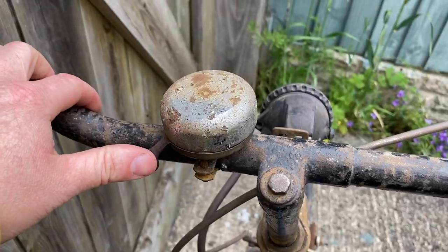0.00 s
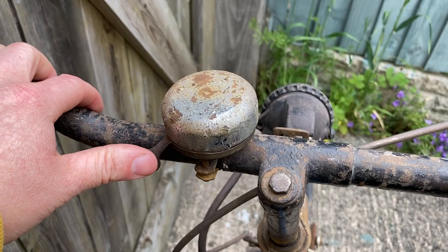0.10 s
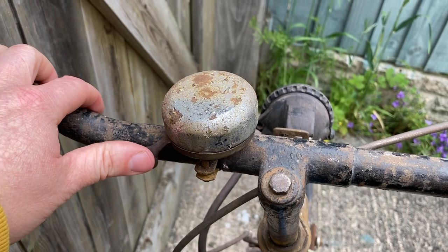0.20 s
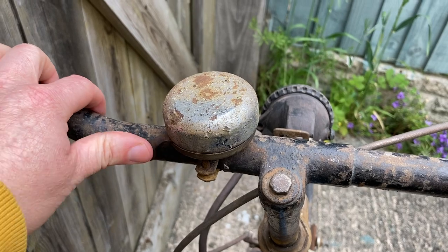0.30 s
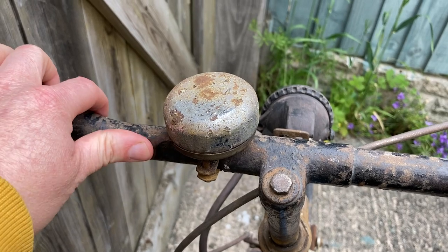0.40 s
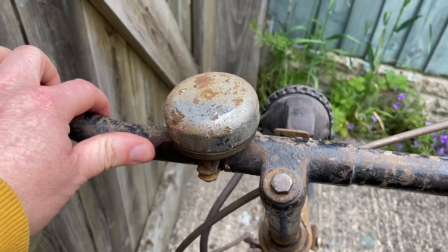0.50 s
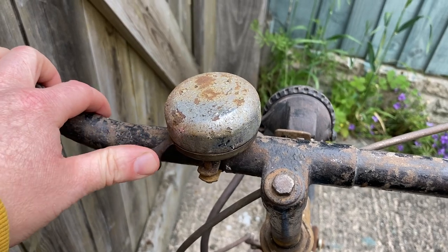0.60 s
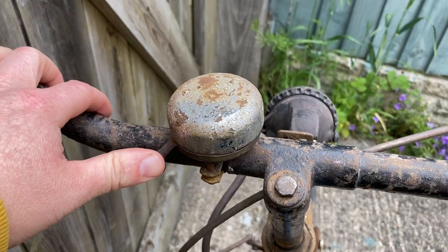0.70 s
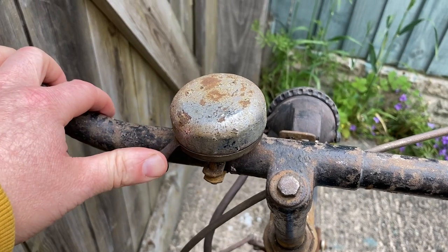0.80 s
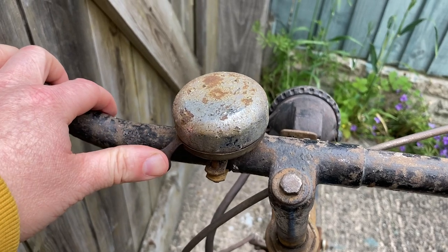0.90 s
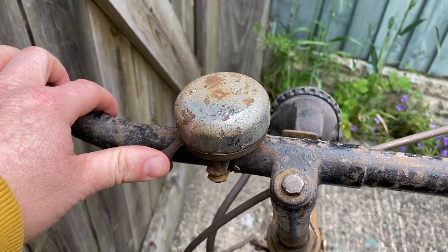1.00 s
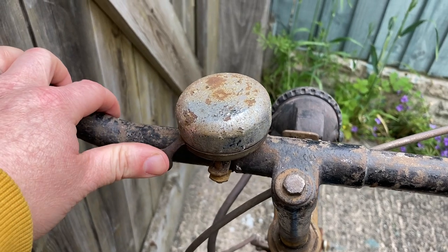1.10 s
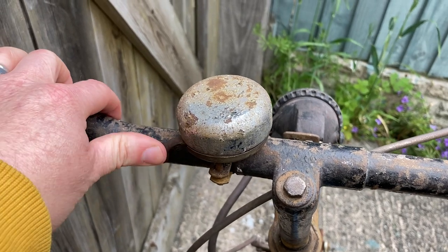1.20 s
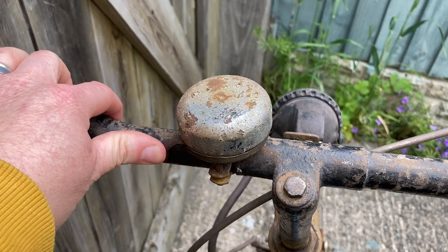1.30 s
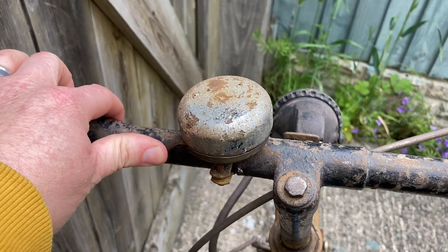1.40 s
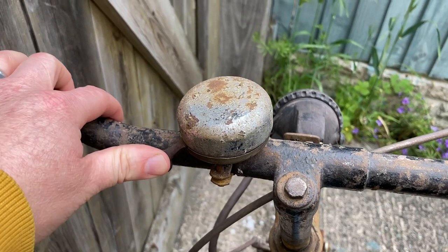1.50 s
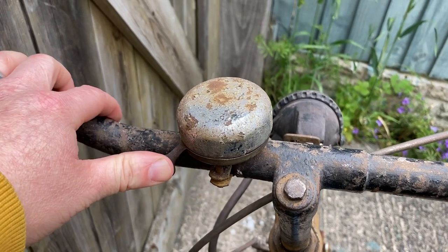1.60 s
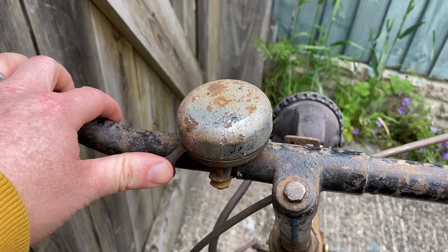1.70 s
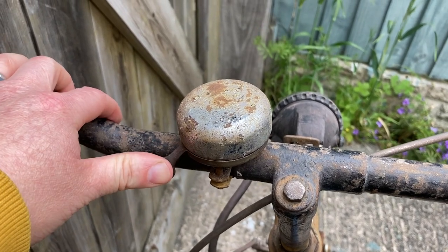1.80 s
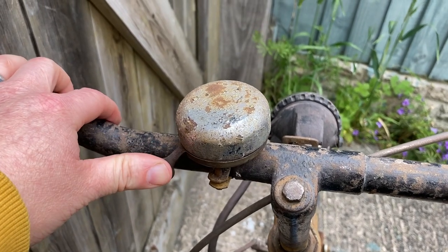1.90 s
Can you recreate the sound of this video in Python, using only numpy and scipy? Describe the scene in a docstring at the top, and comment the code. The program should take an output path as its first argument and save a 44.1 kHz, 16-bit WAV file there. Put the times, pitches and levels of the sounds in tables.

```python
"""An old rusty bicycle bell close to a stereo microphone in a yard, its lever thumbed and let back twice.
Each stroke of the lever spins a small gear that ticks, scrapes and flings strikers at the dome;
the dome rings in five split pairs of damped modes, while shaped noise cracks, clanks and thumps with it.
Lever and handlebar add damped tones. The yard answers with a decaying noise tail,
and behind lie far twittering, made of short sliding whistles, and a filtered-noise town rumble."""
import sys
import numpy as np
from scipy import signal
from scipy.fft import rfft, irfft, next_fast_len
from scipy.io import wavfile
from scipy.ndimage import uniform_filter1d

SR = 44100
rng = np.random.default_rng(int(sys.argv[2]) if len(sys.argv) > 2 else 0)


def elevation(decibels):
    """Turn decibel levels (scalar or array-like) into linear amplitude ratios."""
    levels = np.asarray(decibels, float)
    return 10 ** (levels / 20)


def put_to_file(sound):
    """Save the sound as 16-bit audio at rate SR, in the file named by the first command-line argument."""
    columns = np.atleast_2d(sound).T  # one column per channel
    safe = np.clip(columns, -1, 1)
    whole_steps = np.round(safe * 32767)
    wavfile.write(sys.argv[1], SR, whole_steps.astype(np.int16))


N = 88200
T = np.arange(N) / SR

# contacts with the dome, striker blows and lastly the lever's stop damping it: t/s,
# level/dB of the five mode pairs from low to high (5 columns), lean (tilt of level between paired modes)
BLOWS = [(0.2434, -47, -38.5, -36.5, -15, -12, 0), (0.3132, -50, -35, -39, -15, -12, -3),
         (0.3512, -50, -39, -50, -28, -24, -6), (0.5476, -49.5, -42.5, -41.5, -11, -10, 1),
         (0.581, -51, -38.5, -45, -13, -11.5, -5.5), (0.6084, -44.5, -40.5, -36, -22.5, -16.5, 10),
         (.6360, -48.5, -46, -41.5, -22, -10, 9.5), (1.1143, -53.5, -51.5, -59, -36.5, -39.5, -1.5),
         (1.1791, -42.5, -32.5, -32, -15.5, -14, -1), (1.2072, -42.5, -33.5, -39.5, -18, -9, 6.5),
         (1.241, -46.5, -34.5, -42, -22.5, -19.5, 2), (1.4691, -46, -36.5, -36, -15.5, -22.5, -3),
         (1.5318, -42.5, -28.5, -30, -11.5, -23, -6.5), (1.5574, -38.5, -29, -37.5, -19.5, -15.5, 3.5),
         (1.573, -47.5, -40.5, -44, -30.5, -35.5, 7.5)]


def unit(x):
    """Scales a signal to rms 1."""
    return x / np.sqrt(np.mean(x ** 2) + 1e-20)


def along(points, hz):
    """Reads (f/Hz, value) points on a log frequency axis."""
    f, v = np.transpose(points)
    return np.interp(np.log(hz + 1), np.log(f + 1), v)


def filtered(x, response):
    """Multiplies the spectrum of x by a complex response of frequency."""
    m = next_fast_len(N + 8192)
    spectrum = rfft(x, m) * response(np.fft.rfftfreq(m, 1 / SR))
    return irfft(spectrum, m)[..., :N]


def noise(spectrum, envelope=1):
    """Noise under an envelope, then coloured (rms 1 where a steady envelope is 1)."""
    def gain(hz):
        return elevation(along(spectrum, hz))

    size = np.sqrt(np.mean(gain(np.linspace(0, SR / 2, 4096)) ** 2))
    return filtered(envelope * rng.standard_normal(N), gain) / size


def bursts(times, dbs, t60):
    """Envelope that jumps at each time and dies away by 60 dB in t60 seconds."""
    kicks = np.bincount((np.asarray(times) * SR).astype(int), elevation(dbs), N)[:N]
    return signal.lfilter([1], [1, -elevation(-60 / (max(t60, 1e-3) * SR))], kicks)


def level(strokes):
    """Gain from one (t/s, level/dB) table per stroke, at -120 dB outside each."""
    return sum(elevation(np.interp(T, *np.transpose(p), -120, -120)) for p in strokes)


def knocks(rows, rise_s):
    """Damped sines with a soft start, from rows of t/s, level/dB, f/Hz, t60/s."""
    t = np.maximum(T - np.array(rows)[:, :1], 0)
    _, db, hz, t60 = np.array(rows).T[..., None]
    fade = elevation(db - 60 * t / t60) * (1 - np.exp(-t / rise_s))
    return (fade * np.sin(2 * np.pi * hz * t)).sum(0)


def dome():
    """Each contact chokes the old ring and sets a new level; the two close modes of each pair beat."""
    # the ten modes, lower then upper of each pair: level/dB, t60/s of the first ring, dB per unit of lean
    modes = [(0.5, 0.98, 0), (0.5, 0.94, 0.14), (-0.5, 0.3, 0), (-1.5, 0.3, 1), (-1, 0.13, 0.5),
             (2, 0.14, 0.3549), (0.5, 0.085, 0.5), (-2.5, .095, -0.26), (-3, 0.063, 0), (-7.5, 0.041, 0.12)]
    # pitch of the ten modes: f/Hz
    mode_hz = [1608.7, 1653.6, 3899, 3966, 6684, 6782, 9963, 10099, 13781, 13895]
    # how each mode reaches the two ports of the microphone: left over right/dB, left leads/rad
    ports = [(-0.5, 1.5), (3, -2.5), (1, 0.08), (14, 0.74), (-1.5, 0.43), (2.5, 0), (-0.5, 2.33),
             (1.5, 1.93), (2, 3), (-1, 3.5)]
    # upper mode of each pair: lead over the lower/rad, gain on the return/dB
    upper = [(2.5, 2.5), (-0.6, 1), (-1.47, 4.5), (0.32, -4), (3, 5.5)]
    # lever coming back, strikers circling the other way: from/s, to/s
    returns = [(.45, .8), (1.35, 1.7)]
    # rows, counted from 0, where the lower modes swing on: a light blow, and the lever's stop damping the dome
    swing_on = (2, 14)
    rise_s, mute_s = .0004, 0.00049  # time constants of start and choke
    after_db, after_longer = -14.5, 1.84  # a weaker late ring that outlasts the first

    out = np.zeros((2, N))
    ends = [b[0] for b in BLOWS[1:]] + [np.inf]
    for n, ((s, *pair_db, lean), end) in enumerate(zip(BLOWS, ends)):
        # the choked ring runs a little past the next contact
        a, b = int(s * SR) + 1, int(min(end * SR + 400, N))
        t = T[a:b] - s
        gate = (1 - np.exp(-t / rise_s)) * np.exp(-np.maximum(T[a:b] - end, 0) / mute_s)
        back = any(t0 < s < t1 for t0, t1 in returns)
        for k, (db, t60, tip) in enumerate(modes):
            pair, is_upper = k // 2, k % 2
            hz, (pan_db, lead) = mode_hz[k], ports[k]
            upper_lead, return_db = upper[pair]
            # the lower four pairs may swing on from the contact before
            since = s - BLOWS[n - 1][0] if n in swing_on and k < 8 else 0
            # the upper mode flips its sign between push and return
            swing = 2 * np.pi * hz * (t + since) + is_upper * (upper_lead + np.pi * (not back))
            fade = elevation(-60 * t / t60) + elevation(after_db - 60 * t / (t60 * after_longer))
            strength_db = pair_db[pair] + db + tip * lean + is_upper * back * return_db
            ring = gate * fade * elevation(strength_db)
            out[0, a:b] += ring * np.sin(swing + lead / 2)
            out[1, a:b] += ring * np.sin(swing - lead / 2) * elevation(-pan_db)
    return out


def contact():
    """A bright crack, a rough clank of the rim and a dull thump through the bar at each contact."""
    # colour of the crack: f/Hz, level/dB
    crack = [(1200, -54.5), (2000, -31.5), (2900, -27.5), (3900, -17.5), (5300, -23.5), (7500, -2),
             (9500, -8), (12000, 14.5), (15500, -1), (16500, -20), (17000, -89)]
    # colour of the clank: f/Hz, level/dB
    clank = [(2800, -45.5), (3400, -9), (3930, 2), (4500, -5.5), (5500, -54)]
    # colour of the thump: f/Hz, level/dB
    thump = [(40, -23), (100, 7), (200, 3), (450, -13.5), (800, -3), (1200, -7), (2000, -6), (3000, -120)]
    # each contact in turn, over the usual share: crack/dB, thump/dB
    shares = [(-0.5, -9.5), (-3, -10.5), (-7, -2), (-3.5, -16), (2.5, -15), (3, -4), (2.5, -4.5), (4, 0.5),
              (8.5, -5), (3.5, -7.5), (8, 1.5), (4.5, -8.5), (5.5, -3), (5.5, -7), (-7, 3)]
    rows = np.array(BLOWS)
    times = rows[:, 0]
    crack_db, thump_db = np.transpose(shares)
    force_db = rows[:, 4:6].mean(1)  # from the fourth and fifth pairs
    rim_db = rows[:, 2]  # from the second pair
    cracks = noise(crack, bursts(times, force_db + crack_db + 5, t60=.005))
    clanks = noise(clank) * bursts(times, rim_db - 12.5, t60=0.054)
    thumps = noise(thump) * bursts(times, force_db + thump_db - 24.5, t60=0.056)
    return cracks + clanks + thumps


def gear():
    """Single teeth while slow, an uneven scrape and a low grind while fast."""
    # single teeth: t/s, level/dB
    tooth_rows = [(0.1805, -49.5), (0.1955, -45), (0.207, -45), (0.2187, -50.5), (0.2268, -41),
                  (0.2347, -40), (0.2397, -48.5), (0.2955, -38.5), (0.3035, -33.5), (.3400, -41.5),
                  (.358, -40.5), (0.5085, -48.5), (0.5222, -45.5), (0.5325, -44.5), (0.5385, -39.5),
                  (1.0725, -54), (1.0983, -41), (1.1092, -46.5), (1.128, -38.5), (1.1355, -32),
                  (1.1425, -48.5), (1.149, -42), (1.155, -40), (1.1605, -36.5), (1.1675, -39.5),
                  (1.1735, -37.5), (1.421, -57), (1.4365, -53.5), (1.448, -48), (1.4572, -46), (1.515, -32)]
    # colour of a tooth: f/Hz, level/dB
    tooth = [(1100, -45.5), (1550, -10.5), (2000, -25.5), (3500, -20), (5300, -30), (6900, -13.5),
             (9000, -13.5), (11000, 4), (12600, -10), (15300, -14.5), (16200, -24), (16800, -78.5)]
    # whirr of the spinning gear, one table per stroke: t/s, level/dB
    whirr = [
        [(.2, -62), (.25, -50.5), (.29, -51.5), (.32, -43), (.36, -44.5), (.385, -67), (.42, -81)],
        [(.52, -64), (.55, -53.5), (.63, -53), (.665, -45.5), (.68, -55.5), (.72, -97)],
        [(1.09, -65.5), (1.12, -52), (1.175, -46), (1.25, -32), (1.27, -78), (1.3, -104)],
        [(1.44, -77), (1.48, -39), (1.52, -49.5), (1.58, -35), (1.61, -57), (1.66, -80.5)],
    ]
    # colour of the whirr: f/Hz, level/dB
    scrape = [(1800, -45), (2800, -18.5), (5500, -30), (7800, -10), (9200, -22.5), (11000, 6),
              (13000, -10.5), (15300, -11), (16500, -61.5)]
    # low grind of the gear, one table per stroke: t/s, level/dB before a common 1 dB cut
    grinding = [
        [(0.17, -72), (0.256, -57.5), (0.292, -67.5), (0.32, -52), (0.408, -78.5), (0.42, -93)],
        [(0.5, -84.5), (0.548, -60.5), (0.628, -56), (0.66, -58), (0.678, -92), (0.72, -103)],
        [(1.06, -73), (1.174, -60), (1.182, -47.5), (1.236, -55.5), (1.242, -51), (1.31, -72.5)],
        [(1.41, -80.5), (1.466, -61.5), (1.57, -53), (1.58, -49), (1.612, -70), (1.64, -74.5)],
    ]
    # colour of the grind: f/Hz, level/dB
    grind = [(120, -39), (200, -8), (334, -11.5), (440, -1.5), (729, -16), (1100, -2.5), (1320, -6.5),
             (1450, -1.5), (1880, -34), (3190, -120)]
    steady = 0.11  # share of the whirr that is not grainy

    teeth = bursts(*np.transpose(tooth_rows), t60=.01)
    draw = rng.standard_normal((2000, 2))
    at = np.cumsum(abs(draw[:, 0])) / 290  # irregular gaps, 1/290 s rms
    size_db = 1.5 * draw[:, 1]
    heard = at < N / SR
    grain = unit(bursts(at[heard], size_db[heard], t60=.011))
    scraping = noise(scrape, level(whirr) * (steady + (1 - steady) * grain))
    return noise(tooth, teeth) + scraping + elevation(-1) * level(grinding) * noise(grind)


def lever():
    """The lever clunks against its stop in a few damped modes."""
    # meetings with the stop: t/s, level/dB, pitch over usual (ratio)
    stops = [(.649, -39, 1.04), (1.573, -32.5, .97)]
    # modes of the lever at usual pitch: f/Hz, level/dB, t60/s
    modes = [(1150, -0.5, .045), (2510, -25, 0.11), (3500, -28.5, .06), (5300, -30, .06)]
    rows = [(s, db + mode_db, hz * pitch, t60)
            for s, db, pitch in stops for hz, mode_db, t60 in modes]
    return knocks(rows, rise_s=0.004)


def handlebar():
    """The handlebar hums in low damped tones after a hard stroke."""
    # hums: t/s, level/dB, f/Hz, t60/s
    hums = [(.64, -45.5, 149.4, 0.29), (1.24, -60.5, 151.4, 0.71), (1.58, -41.5, 155, 0.24)]
    return knocks(hums, rise_s=0.031)


def spread(x):
    """Broad sounds of the bell lead in phase at the left port and, in the low middle, are louder there."""
    # lead of the left port: f/Hz, phase/rad
    lead = [(150, 0), (300, 1.1), (1200, 1.3), (3000, .3), (7000, 0), (10000, 1.9), (12300, 2.3),
            (14000, 2.9), (16000, 5.6)]
    # left over right: f/Hz, level/dB
    left = [(150, 1), (300, 5), (800, 6), (1500, 2), (6000, 0)]

    def ports(hz):
        turn = np.exp(np.outer([.5j, -.5j], along(lead, hz)))
        return turn * elevation(np.outer([.5, -.5], along(left, hz)))

    return filtered(x, ports)


def yard(x):
    """Fence and wall answer with a stereo noise tail; each frequency dies at its own speed."""
    # decay of the yard: f/Hz, t60/s
    decay = [(500, 0.083), (4000, 0.17), (12000, 0.056)]
    hz, t, z = signal.stft(rng.standard_normal((2, SR // 2)), SR, nperseg=256)
    fade = elevation(-60 * t / along(decay, hz)[:, None])
    tail = signal.istft(z * fade, SR, nperseg=256)[1]
    return signal.fftconvolve(x[None], tail / np.linalg.norm(tail[0]), axes=1)[:, :N]


def birds():
    """Many short sliding whistles, too far to tell apart."""
    # far twittering ahead of the yard's answer: t/s, level/dB
    twitter = [(0, -82), (.12, -95), (1.6, -105), (1.68, -77), (1.8, -79), (1.86, -98.5), (2, -100)]
    # lowest and highest starting pitch: f/Hz
    low_hz, high_hz = (3130, 5260)
    per_s, note_s = 550, 0.057
    draw = rng.random((900, 3))
    at = np.cumsum(2 * draw[:, 0]) / per_s
    u = np.linspace(0, 1, int(note_s * SR))
    start_hz = low_hz + (high_hz - low_hz) * draw[:, 1:2]
    hz = start_hz * (1 + .15 * (draw[:, 2:] - .6) * u)  # slides by -9 to +6 percent
    notes = np.sin(np.pi * u) ** 2 * np.sin(2 * np.pi * np.cumsum(hz, 1) / SR)
    where = (at * SR).astype(int)[:, None] + np.arange(len(u))
    flock = np.bincount(where.ravel(), notes.ravel(), N)[:N]
    return level([twitter]) * unit(flock)


def town():
    """Distant rumble: steady noise in faint patches of time and frequency, near mono in the bass."""
    # colour of the rumble: f/Hz, level/dB
    colour = [(15, -58.5), (30, -13.5), (68, -0.5), (110, -16), (146, -13), (190, -18.5), (400, -27.5),
              (700, -28.5), (900, -21.5), (1500, -30), (2500, -38), (4000, -48), (6000, -60.5),
              (8000, -100)]
    # left-right likeness: f/Hz, correlation
    alike = [(60, 1), (150, 0.51), (300, .7), (640, 0.1), (1400, .05)]
    z = signal.stft(rng.standard_normal((2, N)), nperseg=512)[2]
    field = rng.standard_normal(z.shape[1:])
    field = uniform_filter1d(uniform_filter1d(field, 5, 0), 12, 1)
    patches = elevation(1.5 * unit(field))  # 1.5 dB rms
    pair = signal.istft(z * patches, nperseg=512)[1][:, :N]

    def mid_side(hz):
        turn = np.arccos(np.clip(along(alike, hz), -1, 1)) / 2
        return elevation(along(colour, hz)) * [np.cos(turn), np.sin(turn)]

    mid, side = filtered(pair, mid_side)
    return elevation(-63) * unit(np.array([mid + side, mid - side]))


def scene():
    """Bell and its works close by, the yard's answer, birds heard only through it, and the town."""
    works = contact() + gear() + lever() + handlebar()
    ring = dome()
    echo = yard(elevation(-21) * works + elevation(-20) * ring[0] + birds())
    return ring + spread(works) + echo + town()


def band_limit(x):
    """A steep low-pass at the top of the band."""
    return signal.sosfilt(signal.butter(12, 17130, fs=SR, output="sos"), x)


def record(dry):
    """Hands on the finished stereo mix."""
    return band_limit(dry)


dry = scene()
out = record(dry)
put_to_file(out)
```